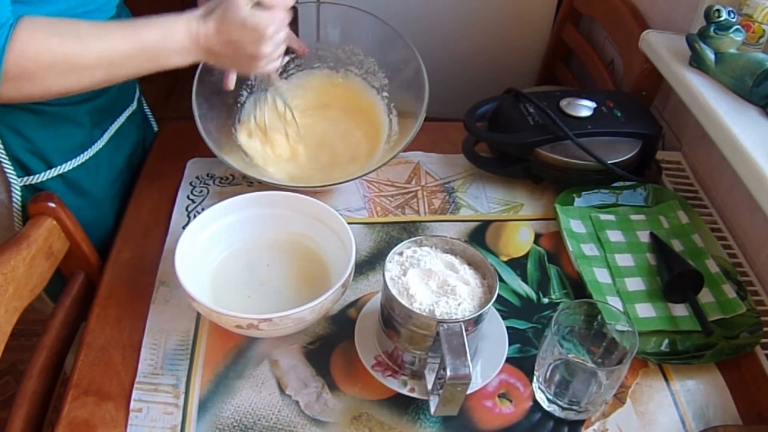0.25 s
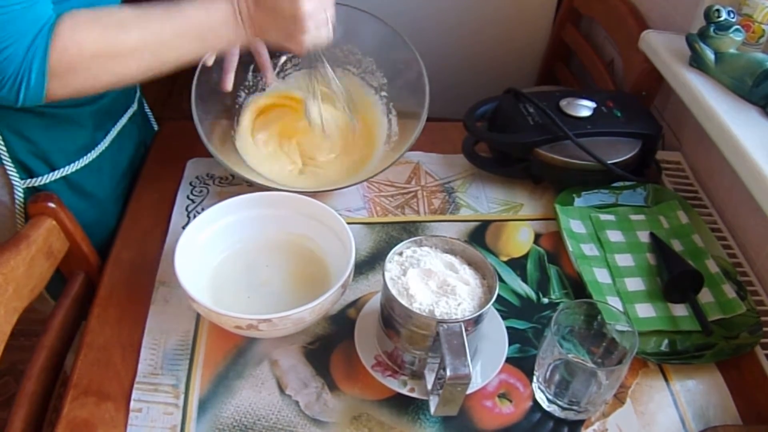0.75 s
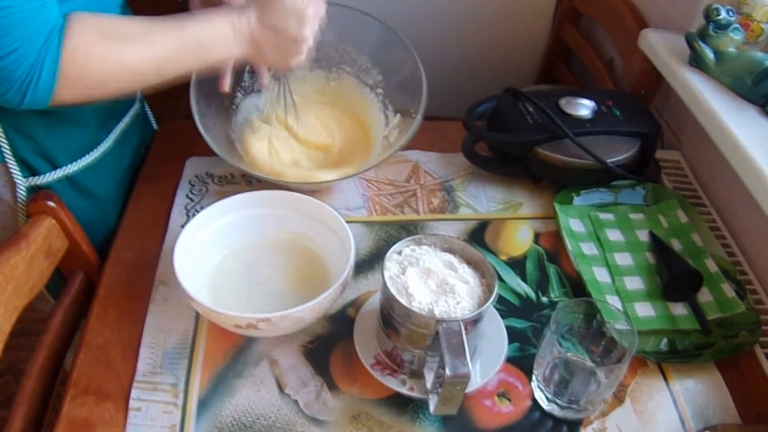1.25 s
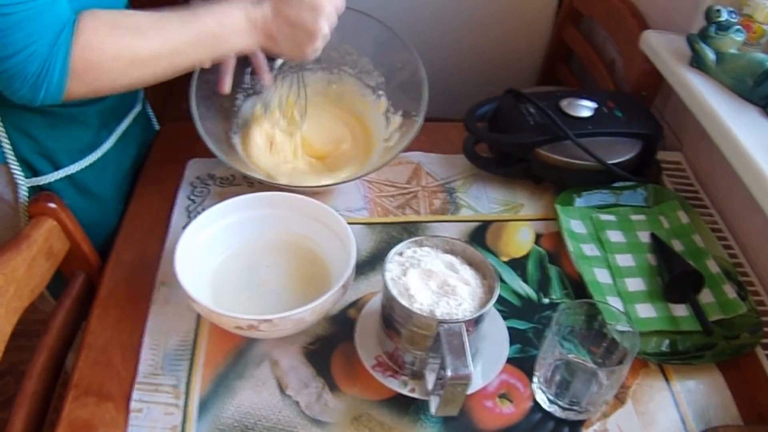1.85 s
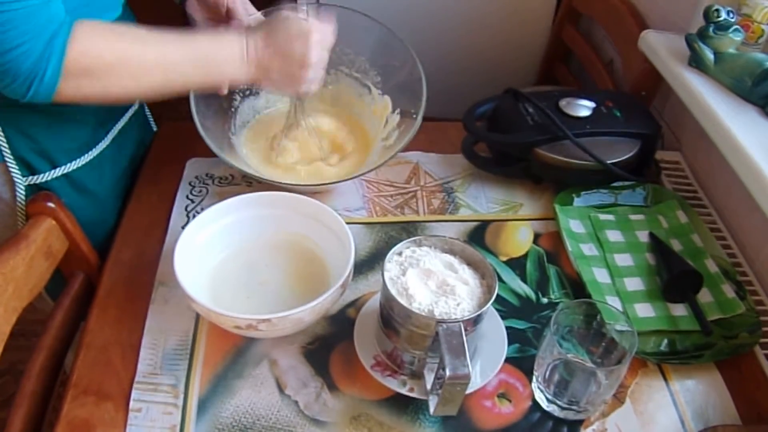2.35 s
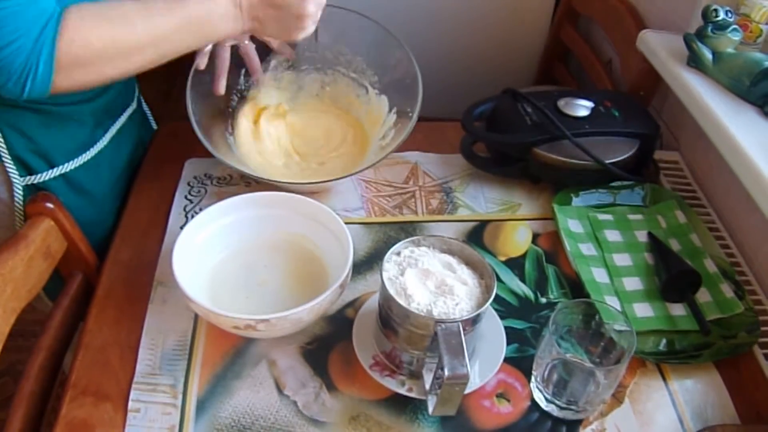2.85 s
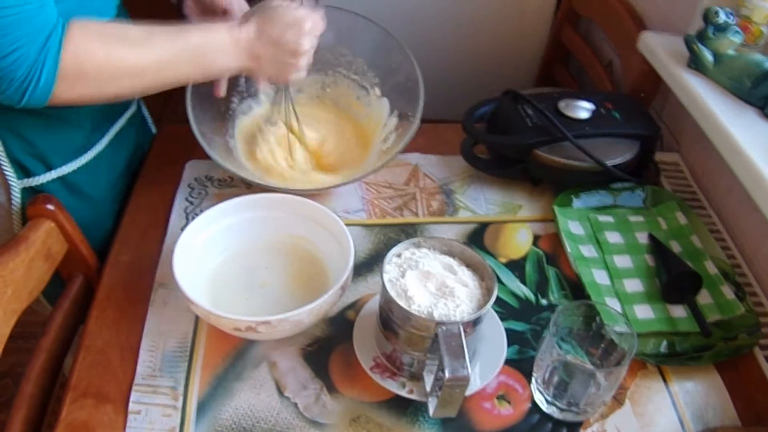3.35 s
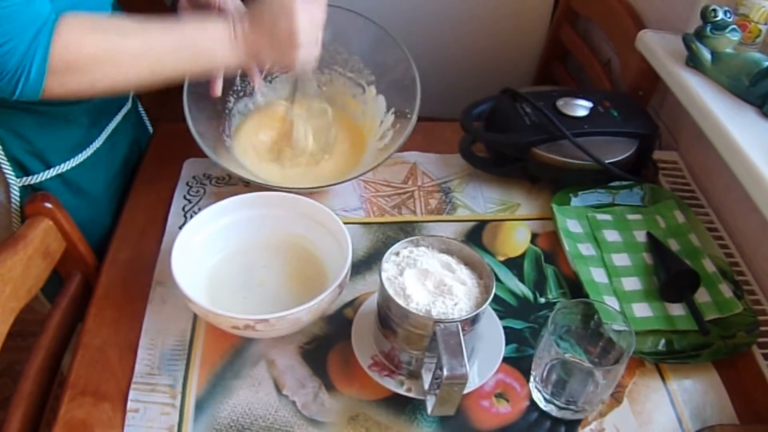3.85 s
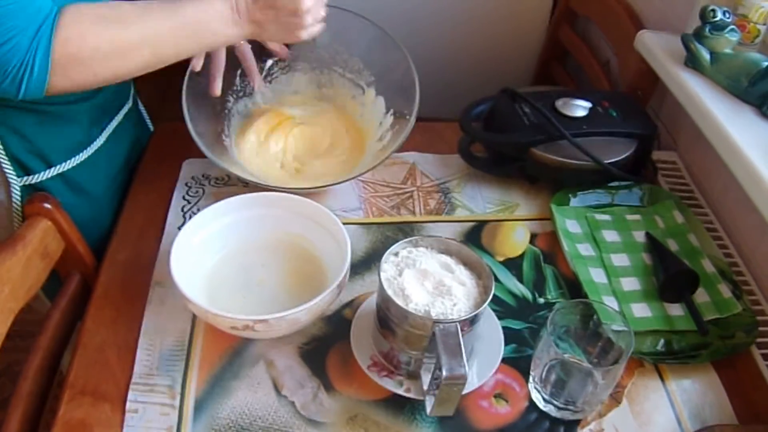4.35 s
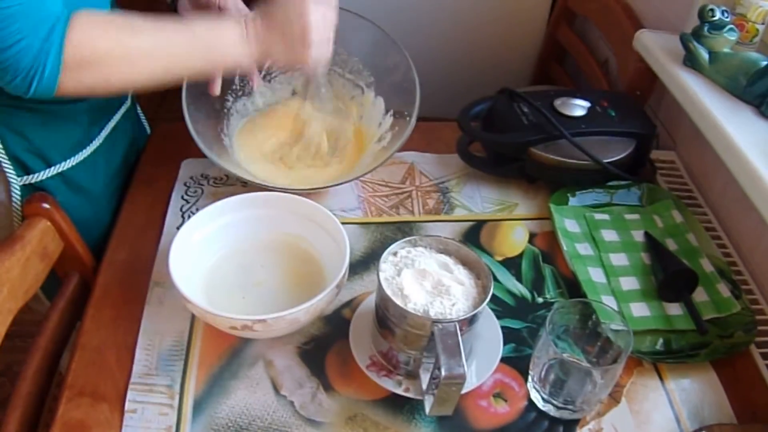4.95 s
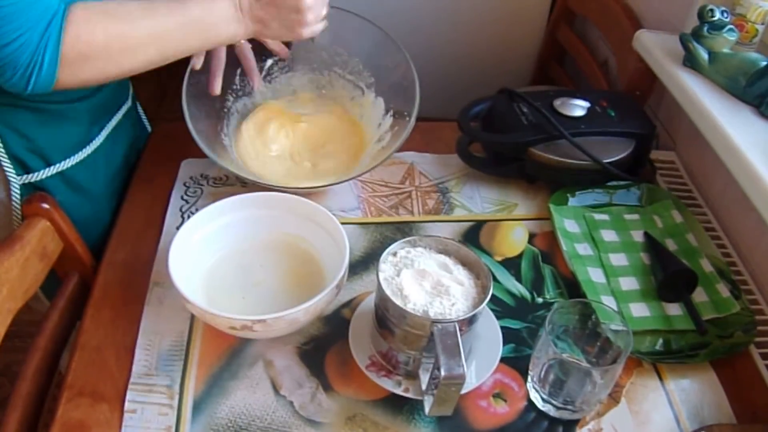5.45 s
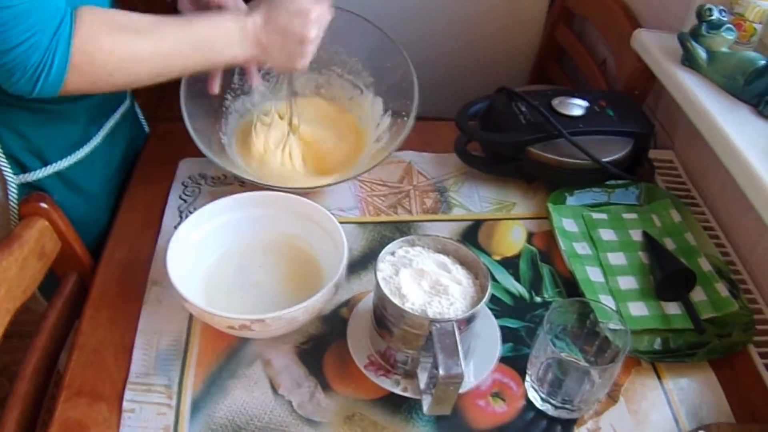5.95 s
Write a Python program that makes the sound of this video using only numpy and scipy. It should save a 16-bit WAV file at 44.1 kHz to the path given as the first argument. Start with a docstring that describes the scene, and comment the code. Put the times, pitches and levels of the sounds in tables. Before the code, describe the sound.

A wire whisk beats thick batter in a glass bowl, about five clinking, rattling strokes a second, with low table thumps in a small kitchen.

```python
"""On a table in a small kitchen, a wire whisk beats thick batter in a glass bowl, about five strokes a second.
Single wires tick on the glass as chirping snaps and slide as grainy noise; then the bundle lands.
Crowds of wire contacts ring the glass modes, a short push booms the table, the wires rattle and drag on.
Sparse echoes make the room ring; under it all lie a quiet hush and the rumble of the rocking table."""
import sys
import numpy as np
from scipy import signal
from scipy.fft import rfft, irfft
from scipy.io import wavfile
from scipy.ndimage import uniform_filter1d

SR = 44100
rng = np.random.default_rng(int(sys.argv[2]) if len(sys.argv) > 2 else 0)


def waveform_to_disk(signal):
    """Save audio, clipped to [-1, 1], as 16-bit WAV at the path in sys.argv[1]."""
    frames = np.transpose(np.atleast_2d(signal))
    scaled = np.clip(frames, -1, 1) * 32767
    samples = np.round(scaled).astype(np.int16)
    wavfile.write(sys.argv[1], SR, samples)


N = 273861

# Wires rattling on glass. Each row: frequency in Hz, density in dB per Hz.
WIRE_SIZZLE = [(2650, -5), (4500, 6), (5080, -23), (5910, 7), (7150, 5.5), (7980, -2), (8410, 1),
               (9240, 4.5), (10600, 5.5), (11700, 0.5), (13300, 3.5), (14800, -2), (15800, 7)]

SPAN = 11025  # samples in one contact sound or one room response: a quarter of a second
LEAD_MS, PEAK_MS = 12, 3.24  # a blow sounds this long before its listed time; contacts peak this long after
LANDING_MS = 2.91  # time constant with which the landing contacts thin out


def blow(s, clink_db, boom_db, thud_db, sizzle_db, spot_hz):
    """The bundle lands wire after wire: glass clinks and thuds, the table booms, the wires drag and rattle on."""
    # Wires dragging through batter. Each row: frequency in Hz, density in dB per Hz.
    drag_colour = [(120, 25), (200, 4), (621, 10), (929, 5.5), (1120, 7), (1520, -1), (1860, 1),
                   (2230, -49), (3400, -58.5), (5180, -30), (7070, -19), (7890, -50), (9470, -42.5),
                   (13200, -46.5), (15800, -60)]
    drag_db, swish_db, drag_t60 = -3.5, -12, 0.27  # dB against the clink; decay in s

    contacts = rattle(LEAD_MS + PEAK_MS, 2.03, LANDING_MS, per_s=6900, spread_db=4.5)
    clink = bowl(contacts, (2300, 5200), spot_hz, ring_db=-9)
    drag = late(scrape(drag_colour, drag_t60, rise=0.001, grain_db=5.0), LEAD_MS)
    swish = late(scrape(WIRE_SIZZLE, drag_t60, rise=0.0067, grain_db=8.0), LEAD_MS)
    # the wires go on rattling against each other after the landing
    wires = rattle(LEAD_MS + 0.1 * PEAK_MS, 1.6, 6.84, per_s=12000, spread_db=2.5)
    sizzle = peaked(coloured(wires, WIRE_SIZZLE))

    out = gain_of(clink_db) * (clink + gain_of(drag_db) * drag + gain_of(swish_db) * swish)
    out += gain_of(boom_db) * table_boom()
    out += gain_of(thud_db) * bowl_thud(s, spot_hz)
    out += gain_of(sizzle_db) * sizzle
    return s - LEAD_MS / 1000, out


def bowl_thud(s, spot_hz):
    """Sparser, longer-lasting bounces of the wires ring three lower bands of bowl modes."""
    # Level of the low band through the scene. Each row: time in seconds, level in dB.
    low_band_level = [(0.5, -6.5), (1.6, 0.5), (3.2, 2.5), (4.9, -1.5), (5.4, 4), (6.1, -2.5)]
    low_db = np.interp(s, *np.transpose(low_band_level))

    bounces = rattle(LEAD_MS + PEAK_MS, 2.95, 3.25 * LANDING_MS, per_s=1400, spread_db=4.5)
    lowest = bowl(bounces, (300, 510), spot_hz, ring_db=6.5)
    low = bowl(bounces, (510, 700), spot_hz, ring_db=1.5)
    middle = bowl(bounces, (700, 2300), spot_hz, ring_db=-5.5)
    return gain_of(-1) * lowest + gain_of(low_db) * low + gain_of(0.5) * middle


def bowl(force, band, spot_hz, ring_db):
    """The dull clatter of the glass in one band, with the modes of that band ringing out of it."""
    # The glass bowl, damped by batter. Each row: mode in Hz, level in dB, 60 dB decay in seconds.
    bowl_modes = [(350, -5, .15), (397, 0, .2), (430, -2, .15), (465, -6, .1), (555, -9, .1),
                  (595, -5, .12), (638, 2, .28), (785, 0, .1), (1010, -2, .12), (1147, -2, .1),
                  (1390, -2, .12), (1680, 0, .12), (1785, -2, .1), (1990, 0, .1), (2100, -2, .08),
                  (2476, -6, .035), (2645, -3, .045), (2945, -3, .035), (3095, -3, .035), (3320, 0, .045),
                  (3700, -1, .035), (4200, 2, .05), (4600, -3, .03)]
    lo, hi = band
    clatter_colour = [(0.42 * lo, -30), (lo, -3), (0.765 * hi, 0), (hi, -5), (1.75 * hi, -30)]
    clatter = peaked(coloured(force, clatter_colour))

    modes = []
    for hz, db, t60 in bowl_modes:
        if lo < hz < hi:
            # the spot struck lifts modes close to its favoured pitch
            favour_db = 4.0 * np.exp(-(np.log(hz / spot_hz) / .1) ** 2)
            modes.append((hz, db + favour_db, t60))
    ringing = rung(force, modes, spot_db=3.0, detune=0.012)
    return peaked(clatter + gain_of(ring_db) * ringing)


def table_boom():
    """One smooth push rocks the bowl on the table just after the landing and rings the table's modes."""
    # The table's higher modes. Each row: frequency in Hz, level in dB, 60 dB decay in seconds.
    knock_modes = [(141, 5.5, 0.13), (198.9, 5, 0.5), (230.2, -3, 0.62), (269, 3.5, 0.21), (300, -34, 0.22)]
    boom_hz = 113.8
    boom_modes = [(boom_hz, 0, .25), (1.256 * boom_hz, -6, .12), (0.91 * boom_hz, -4, .15)]

    push = late(-signal.windows.hann(round(0.0021 * SR)), LEAD_MS + 5.22)
    boom = rung(push, boom_modes, spot_db=0.0, detune=0.055)
    knock = rung(push, knock_modes, spot_db=1.0, detune=0.027)
    return boom + gain_of(-5) * knock


def rattle(peak_ms, rise_ms, fall_ms, per_s, spread_db):
    """Wire contacts of uneven size and random sign that crowd in up to a peak and thin out again."""
    t = 1000 * np.arange(SPAN) / SR - peak_ms
    crowd = 1 / (np.exp(-t / rise_ms) + np.exp(t / fall_ms))
    sizes = gain_of(spread_db * np.minimum(rng.exponential(1, SPAN), 3))
    signs = rng.choice([-1, 1], SPAN)
    touching = rng.random(SPAN) < per_s / SR
    return crowd * sizes * signs * touching


def tick(s, tick_db, hz, slide_db):
    """One wire snaps against the glass and slides along it, waking the upper modes of the glass."""
    # A wire sliding on glass. Each row: frequency in Hz, density in dB per Hz.
    slide_colour = [(350, -10), (600, -6), (1500, -12), (2600, -9.5), (3000, -10), (3350, 3), (3750, -12),
                    (4200, -9.5), (4800, -14), (6500, -19), (9000, -23), (15800, -44)]
    slide_t60 = 0.26  # s

    body = scrape(slide_colour, slide_t60, rise=0.0017, grain_db=3.5)
    treble = scrape(WIRE_SIZZLE, slide_t60, rise=0.00046, grain_db=7.0)
    out = gain_of(slide_db) * (body + gain_of(1) * treble)
    add(out, 0, gain_of(tick_db) * snap(hz, glide=0.608))
    return s - .001, out


def scrape(points, t60, rise, grain_db):
    """Wires rubbing: grainy noise that swells with time constant rise (s) and dies away."""
    t = np.arange(SPAN) / SR
    grain = gain_of(grain_db * evened(uniform_filter1d(rng.standard_normal(SPAN), size=130)))
    slips = gain_of(2.0 * evened(uniform_filter1d(rng.standard_normal(SPAN), size=600)))  # slower
    noise = evened(grain * slips * coloured(rng.standard_normal(SPAN), points))
    return noise * (1 - np.exp(-t / rise)) * gain_of(-60 * t / t60)


def snap(hz, glide):
    """A brief contact whose bending waves reach the air treble first: a noisy chirp falling towards hz."""
    t = np.arange(512) / SR
    pitch = hz * (1 + glide * np.exp(-t / 0.000756))
    phase = 2 * np.pi * np.cumsum(pitch) / SR
    rough = 1 + evened(uniform_filter1d(rng.standard_normal(len(t)), size=12))
    return peaked(rough * np.sin(phase) * t * np.exp(-t / 0.0012))


def rung(force, modes, spot_db, detune):
    """A force rings decaying modes, each a close pair with chance shifts of level (dB) and pitch (fraction)."""
    t = np.arange(SPAN) / SR
    hz, db, t60 = np.transpose(modes + modes)[:, :, None]
    level_chance, pitch_chance = rng.standard_normal((2, len(hz), 1))
    decay = gain_of(db + spot_db * level_chance - 60 * t / t60)
    rings = decay * np.sin(2 * np.pi * hz * (1 + detune * pitch_chance) * t)
    return peaked(signal.fftconvolve(force, rings.sum(0))[:SPAN])


def kitchen():
    """Room response: sparse echoes of random sign, each band dying at its own speed."""
    # How long the kitchen rings. Each row: frequency in Hz, 60 dB decay in seconds.
    room_decay = [(80, 0.28), (250, 0.39), (600, 0.31), (1500, 0.37), (4000, 0.33), (10000, 0.24)]
    taps = np.zeros(SPAN)
    at = np.arange(130, SPAN - 20, 20)  # one echo somewhere in every 20 samples
    taps[at + rng.integers(0, 20, len(at))] = rng.choice([-1., 1.], len(at))
    hz, t, z = signal.stft(taps, SR, nperseg=256)
    fade = gain_of(-60 * t / read(room_decay, hz)[:, None])
    tail = signal.istft(z * fade, SR, nperseg=256)[1]
    return tail / np.linalg.norm(tail)


def background():
    """Two shaped noises: the quiet of the kitchen and the low rumble of the table rocking under the strokes."""
    # The quiet of the kitchen. Each row: frequency in Hz, density in dB per Hz.
    hush_colour = [(60, -6), (300, 0), (700, -8), (2000, -22), (3800, -16), (6000, -27), (15800, -33)]
    # Rumble of the rocking table. Each row: time in seconds, level in dB.
    rumble_level = [(0.0, -82), (0.45, -85), (0.85, -67), (1.9, -55.5), (6.21, -62)]
    rumble_colour = [(18, -42), (28, 7), (40, 10), (55, -10), (120, -2), (170, -12), (260, -60)]

    s, db = np.transpose(rumble_level)
    rumble_db = np.interp(np.arange(N) / SR, s, db)
    rumble = evened(coloured(rng.standard_normal(N), rumble_colour))
    hush = evened(coloured(rng.standard_normal(N), hush_colour))
    return gain_of(-61) * hush + gain_of(rumble_db) * rumble


def gain_of(db):
    """Decibels to gain."""
    return 10 ** (np.asarray(db) / 20)


def evened(x):
    """Scales to rms 1."""
    return x / np.sqrt(np.mean(x ** 2) + 1e-20)


def peaked(x):
    """Scales so that the loudest 4 ms have rms 1."""
    return x / np.sqrt(uniform_filter1d(x ** 2, size=176).max() + 1e-20)


def read(points, hz):
    """Value of a table on a log-frequency axis."""
    f, value = np.transpose(points)
    return np.interp(np.log(hz + 1), np.log(f + 1), value)


def coloured(x, points):
    """Filters x by the gains of a table of Hz and dB."""
    gains = gain_of(read(points, np.fft.rfftfreq(len(x), 1 / SR)))
    return irfft(rfft(x) * gains, len(x))


def late(x, ms):
    """Delays x, keeping at most one span."""
    return np.append(np.zeros(round(ms * SR / 1000)), x)[:SPAN]


def add(mix, s, sound):
    """Mixes a sound in at time s, cut where the mix ends."""
    part = mix[round(s * SR):][:len(sound)]
    part += sound[:len(part)]


def scene():
    """Every contact is heard direct and through the kitchen, from one of six spots with their own echoes."""
    # The bundle landing. Each row: time in seconds, clink in dB, table boom in dB, thud of the
    # bowl's lower modes in dB, wire sizzle in dB, pitch favoured by the spot struck in Hz.
    landings = [(0.5852, -24, -59, -28.5, -25, 920), (0.7865, -20.5, -43, -29.5, -23, 2700),
                (0.9825, -20, -29.5, -27, -27.5, 970), (1.1757, -25, -39, -35, -25.5, 3270),
                (1.377, -26, -23.5, -41, -25, 4260), (1.5685, -23.5, -27.5, -34, -23, 3750),
                (1.7614, -24.5, -21.5, -30.5, -24, 1390), (1.9531, -26.5, -29.5, -34, -27.5, 4200),
                (2.1467, -24.5, -22, -32.5, -22.5, 2090), (2.3451, -26, -24, -34.5, -26.5, 4160),
                (2.5393, -27, -21.5, -36, -25.5, 4160), (2.7297, -27.5, -28, -32, -25, 3680),
                (2.9241, -28.5, -21.5, -33, -25.5, 4270), (3.1139, -31.5, -24, -31, -30, 3530),
                (3.3088, -26, -28.5, -34.5, -26.5, 3300), (3.4922, -25, -30, -32, -25, 2900),
                (3.678, -23.5, -24.5, -33, -20.5, 3310), (3.8752, -23.5, -19.5, -30, -25.5, 3440),
                (4.059, -22.5, -23.5, -26.5, -25, 3370), (4.2375, -23, -35, -33, -25, 3340),
                (4.4166, -21, -18, -28, -24.5, 3480), (4.6034, -20.5, -19.5, -31, -24.5, 2020),
                (4.791, -22.5, -18, -30, -21, 4350), (4.9756, -20.5, -21, -35, -22.5, 3550),
                (5.1585, -19, -24.5, -32.5, -18.5, 2690), (5.3412, -19, -26, -30, -22.5, 3470),
                (5.5225, -24, -21, -26.5, -21.5, 4240), (5.704, -21.5, -18, -29, -20, 1040),
                (5.8854, -21.5, -18, -26.5, -22.5, 4200), (6.07, -20.5, -19.5, -29, -18.5, 4200)]
    # Single wires touching the glass. Each row: time in seconds, tick in dB, pitch in Hz, slide in dB.
    wire_touches = [(0.003, -39.5, 3860, -40), (0.04, -56, 2670, -41.5), (0.11, -34.5, 2780, -42),
                    (0.122, -46, 3100, -57), (0.157, -45, 3250, -59), (0.248, -52, 3800, -57.5),
                    (0.362, -50, 3700, -59), (0.386, -45, 3740, -40.5), (0.41, -36.5, 3440, -57),
                    (0.567, -39, 4280, -44), (0.577, -43, 3300, -39), (0.767, -62, 2110, -41.5),
                    (0.959, -49, 3730, -37.5), (1.156, -35, 3810, -34.5), (1.345, -42, 3750, -47),
                    (1.358, -38, 2840, -48), (1.549, -45, 4910, -46), (1.561, -33, 2620, -36),
                    (1.742, -56, 1890, -41), (1.753, -33, 2680, -38), (1.931, -40, 2760, -40),
                    (2.126, -49, 2180, -41), (2.135, -31.5, 2050, -40.5), (2.319, -40, 2460, -37.5),
                    (2.34, -30, 3030, -46), (2.512, -48, 2770, -38), (2.519, -50, 4460, -44),
                    (2.705, -61, 3450, -44.5), (2.717, -33, 2750, -35.5), (2.899, -57, 3800, -47),
                    (2.912, -44, 1820, -40), (3.088, -50, 3300, -46.5), (3.106, -37, 2600, -33.5),
                    (3.281, -58, 3020, -47), (3.293, -40, 2310, -36), (3.469, -47, 4630, -41),
                    (3.657, -40.5, 3600, -47), (3.667, -27.5, 2540, -43), (3.852, -45, 4300, -47),
                    (3.86, -39, 2640, -42), (4.035, -52, 3400, -50), (4.048, -43, 3550, -33.5),
                    (4.223, -36, 3750, -34.5), (4.396, -41, 4360, -47.5), (4.58, -40, 4450, -35.5),
                    (4.765, -47, 1840, -47.5), (4.952, -47, 3780, -44.5), (5.136, -38, 4220, -39),
                    (5.314, -53, 2440, -40.5), (5.497, -39, 4320, -40.5), (5.683, -42, 3620, -41),
                    (5.862, -37, 5100, -41), (6.048, -41, 2870, -47), (6.061, -35, 2680, -56)]
    # Late taps of a trailing wire and pops of batter. Each row: start in seconds, level in dB, pitch in Hz.
    late_taps = [(1.432, -35, 4200), (1.435, -41, 6400), (2.589, -36, 3440), (2.970, -37, 12400),
                 (2.980, -35.5, 3470), (2.995, -43, 11700), (3.005, -46, 12600), (3.177, -40.5, 4300),
                 (3.22, -47, 3130), (3.370, -47, 6300), (3.381, -42, 3260), (3.919, -39, 12800),
                 (3.937, -45, 12000), (3.955, -46, 12700)]

    contacts = [blow(*row) for row in landings]
    contacts += [tick(*row) for row in wire_touches]
    contacts += [(s, gain_of(db) * snap(hz, glide=0.16)) for s, db, hz in late_taps]

    spots = np.zeros((6, N))
    for k, (s, sound) in enumerate(contacts):
        add(spots[k % len(spots)], s, sound)
    mix = np.zeros(N)
    for spot in spots:
        echoes = signal.oaconvolve(spot, kitchen())[:N]
        mix += spot + gain_of(-6) * echoes
    # the table top radiates little below its lowest mode
    mix = signal.sosfilt(signal.butter(5, 86, "high", fs=SR, output="sos"), mix)
    return (mix + background())[None]


def record(dry):
    """The microphone has three narrow dead spots and rolls off in the top; then the band limit."""
    # Dead spots of the microphone. Each row: centre in Hz, width in Hz.
    dead_spots = [(7850, 340), (8070, 460), (11700, 570)]
    out = dry
    for hz, width_hz in dead_spots:
        out = signal.lfilter(*signal.iirnotch(hz, hz / width_hz, SR), out)
    out = signal.sosfilt(signal.cheby2(8, 40, 15850, fs=SR, output="sos"), out)
    band_limit = signal.firwin(511, 16400, window=("kaiser", 9), fs=SR)
    return signal.oaconvolve(out, band_limit[None], "same")


dry = scene()
out = record(dry)
waveform_to_disk(out)
```